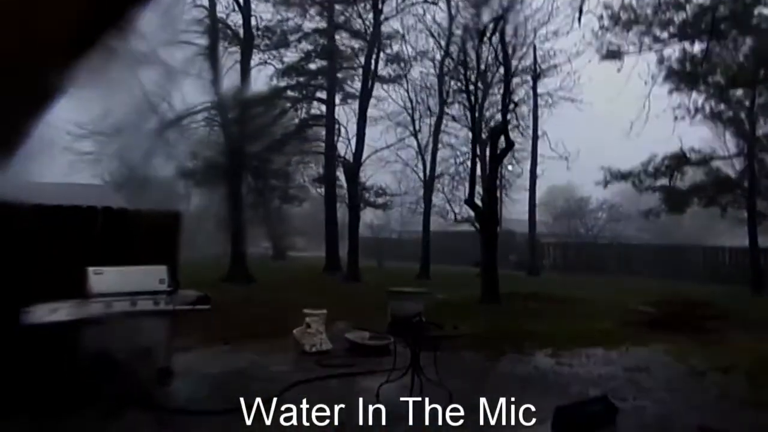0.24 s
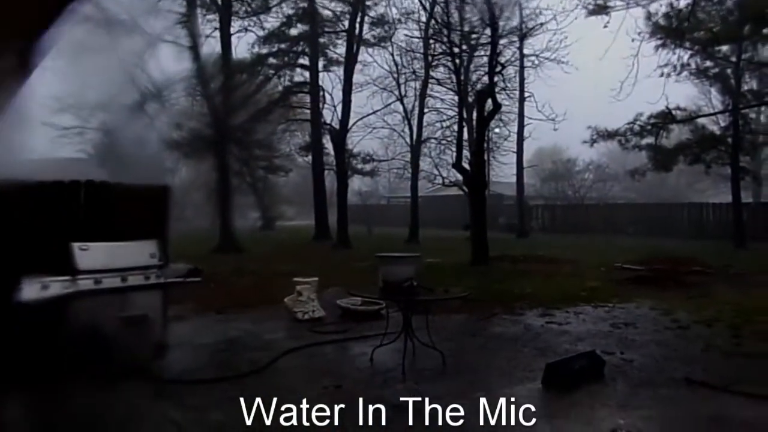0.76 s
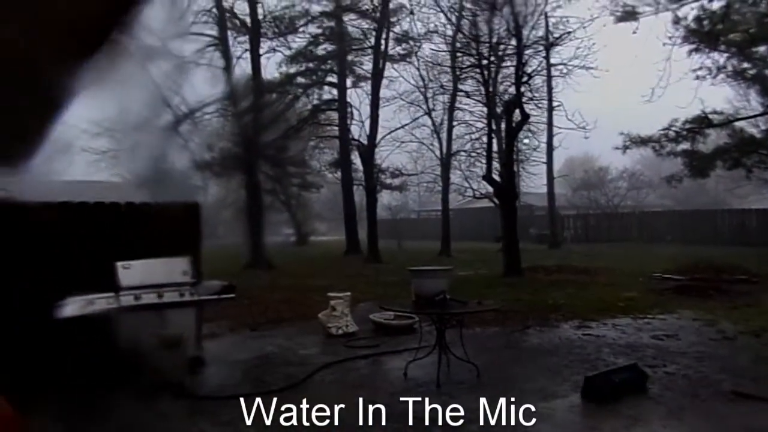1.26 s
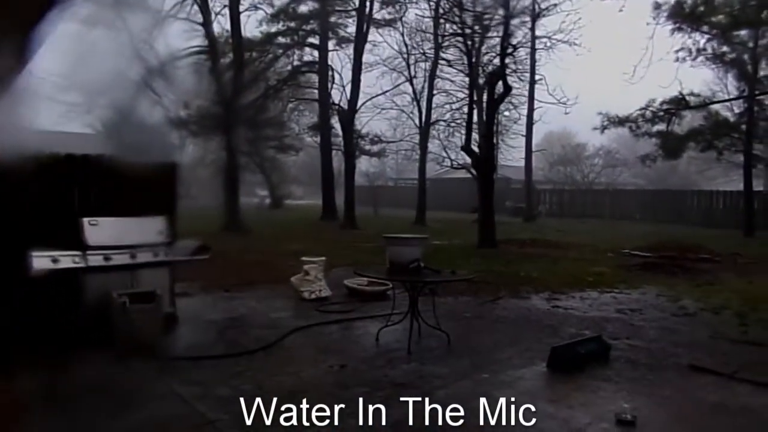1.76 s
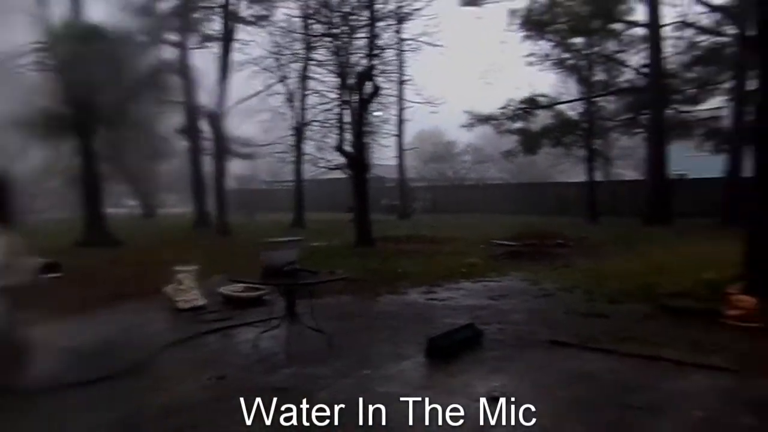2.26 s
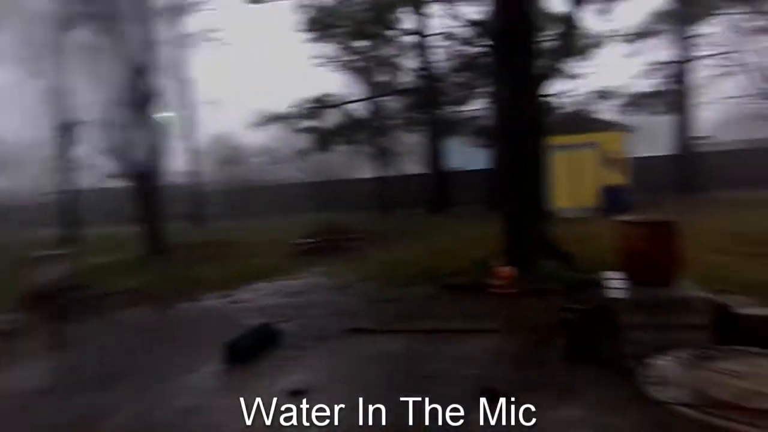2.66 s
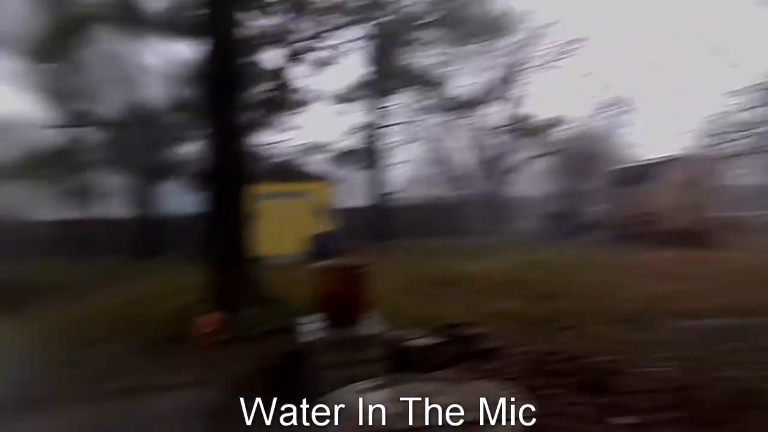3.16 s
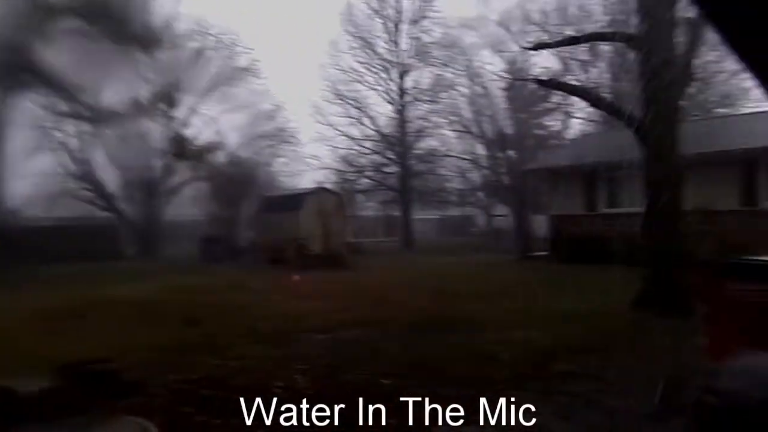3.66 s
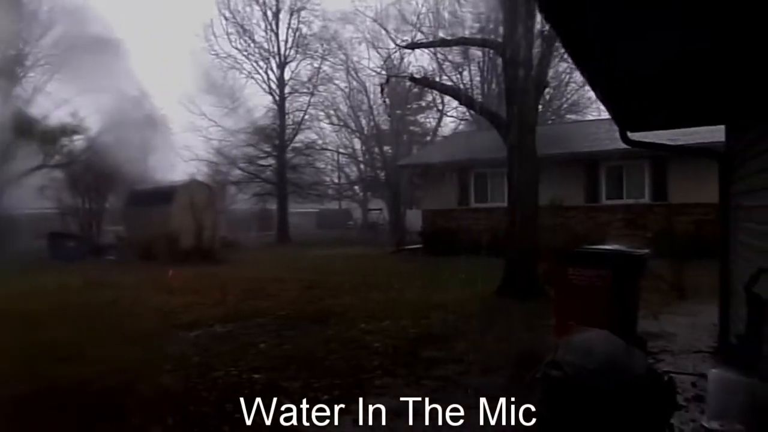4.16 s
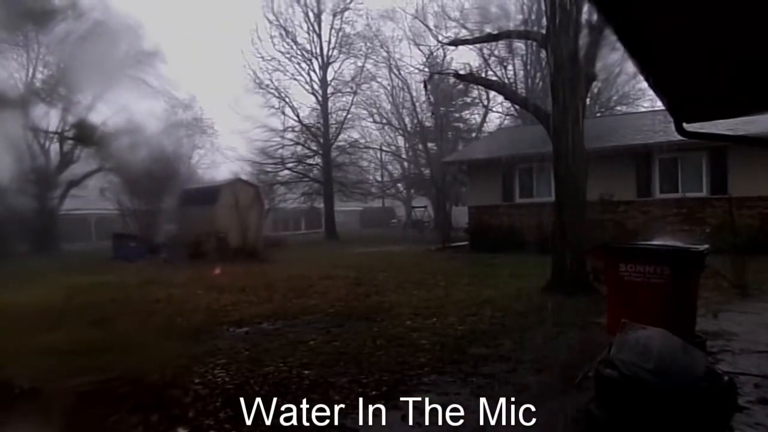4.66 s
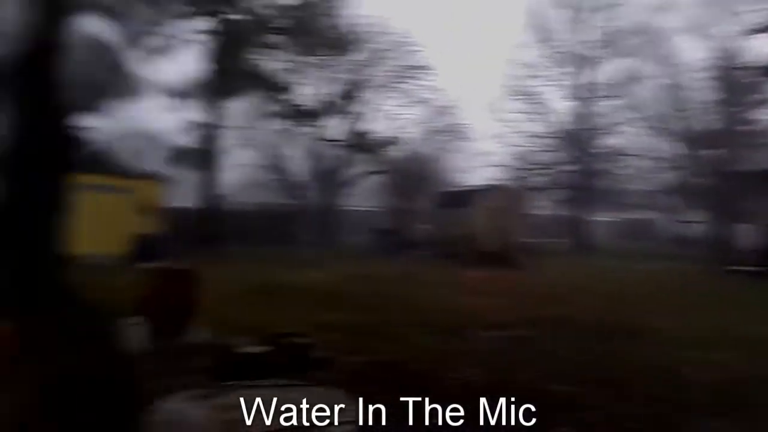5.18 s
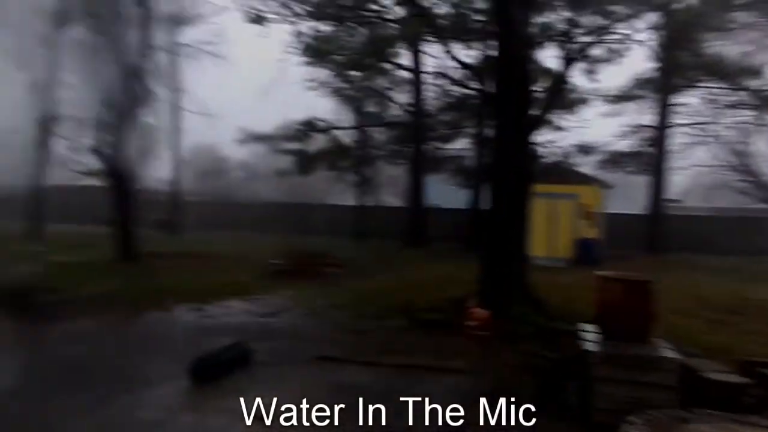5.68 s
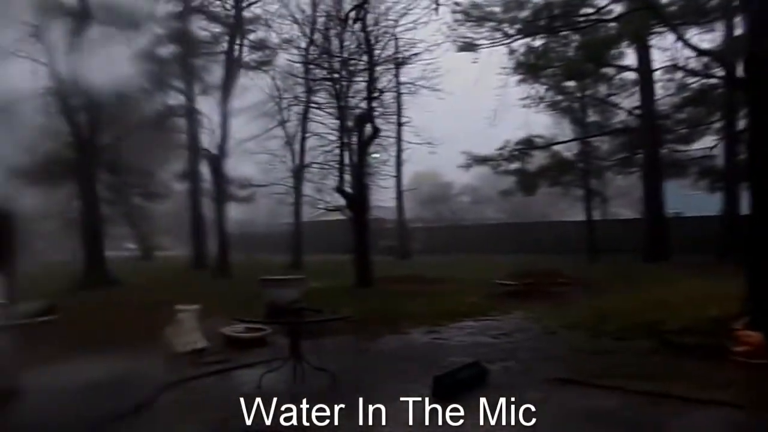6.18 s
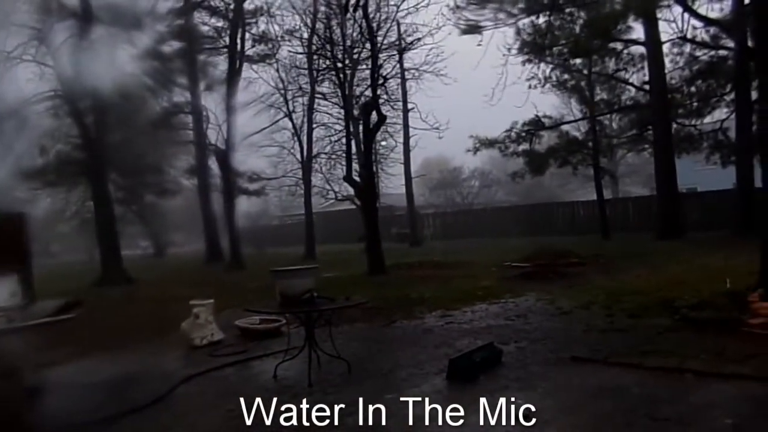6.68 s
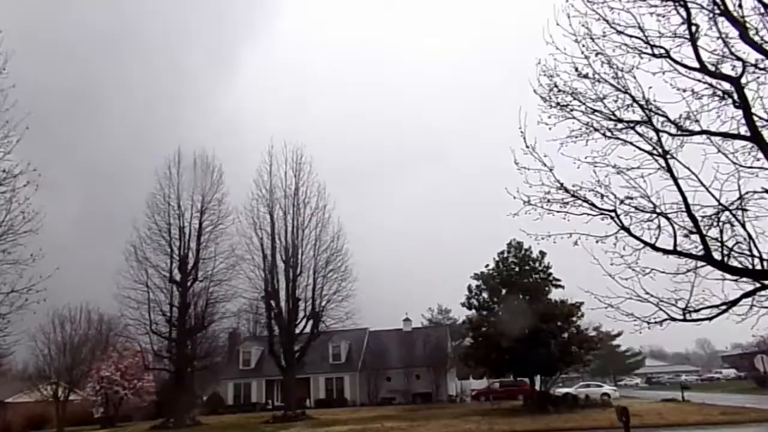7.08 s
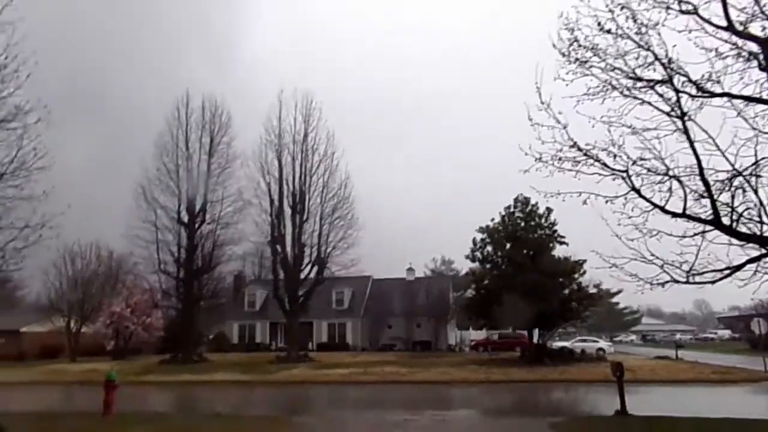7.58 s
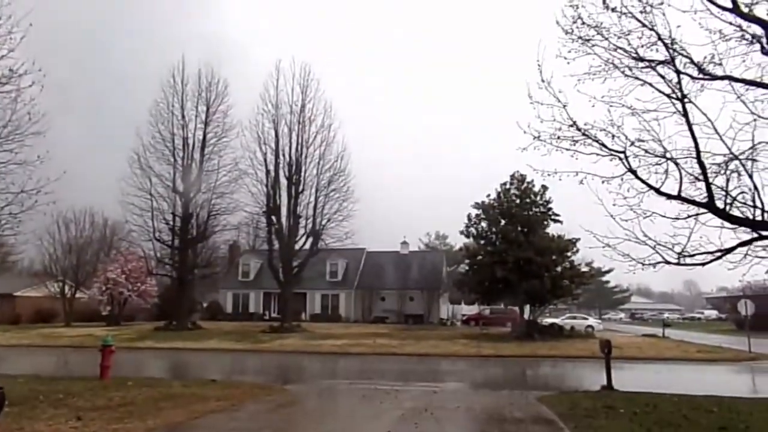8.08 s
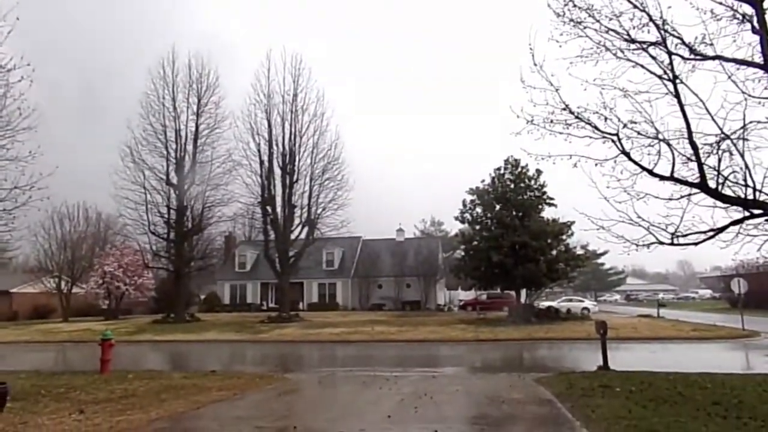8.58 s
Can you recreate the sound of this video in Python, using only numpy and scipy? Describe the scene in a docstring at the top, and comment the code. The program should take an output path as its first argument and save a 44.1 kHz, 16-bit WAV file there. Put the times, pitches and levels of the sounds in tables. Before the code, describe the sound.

Steady rain on a patio and lawn heard through a handheld microphone plugged with water: dull, hollow, ringing at two middle pitches. A very loud knock and splash come at the start, smaller knocks and rubs after a second, then occasional taps and drips and a low far thump near four seconds. At about seven seconds it cuts to quieter, open hissing rain, with a thunder crack followed by heavier booms rolling to the end.

```python
"""Steady rain on a patio and lawn, from under the eaves, on a camera held in the hand with water in its mic port:
noise and pings of near drops, dulled and made to ring at two pitches by the water plug. Shaped noise makes
splashes, thumps, rubs and far rolls of thunder; short ringing pulses make knocks, and band bursts make drips.
After a cut the port is clear: the rain hisses openly, and thunder cracks and booms as decaying noise."""
import sys
import numpy as np
from scipy import signal
from scipy.fft import rfft, irfft
from scipy.io import wavfile
from scipy.ndimage import uniform_filter1d

SR = 44100
rng = np.random.default_rng(int(sys.argv[2]) if len(sys.argv) > 2 else 0)


def wav_record(signal):
    """Record a signal, one row per channel, as 16-bit PCM in the file named by sys.argv[1]."""
    frames = np.transpose(np.atleast_2d(signal))
    bounded = np.clip(frames, -1, 1)
    # unit amplitude maps onto the largest positive 16-bit level
    quanta = np.round(bounded * 32767).astype(np.int16)
    wavfile.write(sys.argv[1], SR, quanta)


N = 389844
TIME = np.arange(N) / SR  # s
FREQ = np.arange(8193) * SR / 16384  # Hz


def undb(db):
    """Decibels to gain."""
    return 10 ** (np.asarray(db) / 20)


def unit(x):
    """Scale to rms 1."""
    return x / np.sqrt(np.mean(x ** 2))


def slopes(points):
    """Gain in dB over frequency, drawn through (Hz, dB) points on a log frequency axis."""
    hz, db = np.transpose(points)
    return np.interp(np.log(FREQ + 1), np.log(hz), db)


def bumps(rows):
    """Gain in dB over frequency of bell-shaped resonances or dips (Hz, width Hz, dB)."""
    return sum(db * np.exp(-((FREQ - hz) / width) ** 2) for hz, width, db in rows)


def colour(x, db):
    """Causal minimum-phase filter with the given gain, so that resonances ring after a blow."""
    cepstrum = irfft(np.log(undb(db)))[:len(FREQ) - 1]
    cepstrum[1:] *= 2  # fold the cepstrum onto positive time
    spectrum = np.exp(rfft(cepstrum, 2 * len(cepstrum)))
    response = irfft(spectrum)[:len(FREQ) // 2]
    return signal.oaconvolve(x, response)[:len(x)]


def walk(rate):
    """Random levels held 1 / rate s and slewed twice; spread near 1."""
    hold = max(int(SR / rate), 1)
    steps = np.repeat(rng.standard_normal(N // hold + 1), hold)
    slewed = uniform_filter1d(uniform_filter1d(steps, hold), hold)
    return np.sqrt(2) * slewed[:N]


def add(track, s, sound):
    """Mix a sound in at time s."""
    start = int(s * SR)
    track[start:start + len(sound)] += sound[:N - start]


def bell(s, half_s):
    """A smooth rise and fall around time s; peak 1."""
    return np.exp(-((TIME - s) / half_s) ** 2)


def strike(rise_s, t60):
    """One second of envelope: a straight rise, then a steady decay by 60 dB in t60 seconds."""
    t = TIME[:SR]
    decay = np.exp(-np.log(1000) * np.maximum(t - rise_s, 0) / t60)
    return np.minimum(t / rise_s, 1) * decay


def burst(decay_s, db, size=4096):
    """A short splash of force through a filter; peak 1."""
    force = rng.standard_normal(size) * np.exp(-TIME[:size] / max(decay_s, 1 / SR))
    x = colour(force, db)
    return x / np.abs(x).max()


def grainy(grain_db, db):
    """One second of noise with a rough, flickering level, coloured; rms 1."""
    rough = rng.standard_normal(SR) * undb(grain_db * walk(500)[:SR])
    return unit(colour(rough, db))


def swells(rows, db):
    """Grainy noise of one colour that swells and fades once for each row."""
    power = sum(undb(2 * level_db) * bell(s, half_s) for s, half_s, level_db in rows)
    rough = rng.standard_normal(N) * undb(3.0 * walk(300))
    return np.sqrt(power) * unit(colour(rough, db))


def patter(spread_db, cycles, count, size=256):
    """Many drops, each a ping of a cycle or two at its own pitch; a few land near and are loud."""
    when, pitch, near = rng.random((count, 3)).T
    hz = 500 * 32 ** pitch
    closeness = -np.log(np.maximum(near, .004))  # large for few drops
    turns = hz[:, None] * TIME[:size]
    strength = hz * undb(spread_db * closeness)
    pings = strength[:, None] * np.sin(2 * np.pi * turns) * np.exp(-turns / cycles)
    places = (when * N).astype(int)[:, None] + np.arange(size)
    return unit(np.bincount(places.ravel(), pings.ravel(), N + size)[:N])


def rain(drops_db, spread_db, cycles, flicker_db):
    """Far drops merge into a wash, near ones patter on top; the fall is slightly uneven."""
    near = undb(drops_db) * patter(spread_db, cycles, count=12000)
    return (rng.standard_normal(N) + near) * undb(flicker_db * walk(25))


# Rain as it comes through the wet port. Each row: frequency in Hz, relative level in dB per Hz.
WET_RAIN_COLOUR = [(30, -29), (90, -8.5), (220, 3.5), (330, 1), (500, 0.5), (620, -3.5), (1130, 1),
                   (1500, -14), (3100, -20), (3900, -29), (4700, -28.5), (6100, -49), (8600, -54),
                   (10600, -38), (14500, -48.5)]
# Ringing of the water plug in the port. Each row: pitch in Hz, width in Hz, gain in dB.
PLUG_RINGS = [(719.2, 70.6, 16.5), (965.6, 76, 13.5)]


def wet_port_gain():
    """Gain in dB of the wet port: muffled treble and the two resonances of the plug."""
    return slopes(WET_RAIN_COLOUR) + bumps(PLUG_RINGS)


RAIN_WET_DB = -23
# the rain swells a little as the camera turns across the yard
TURN_S, TURN_HALF_S, TURN_DB = 3.06, 0.66, 1.3


def wet_rain():
    """Rain on patio and lawn, heard through the ringing plug of water."""
    fall = rain(drops_db=-5.5, spread_db=2.5, cycles=1.0, flicker_db=0.94)
    level_db = RAIN_WET_DB + TURN_DB * bell(TURN_S, TURN_HALF_S)
    return unit(colour(fall, wet_port_gain())) * undb(level_db)


# Drops that land right on the port, at no distance. Each row: start in seconds, splash peak in dB.
PORT_SPLASHES = [(0.1961, 12.5), (1.2245, -21), (4.8985, -21.5)]
# a softer splash loses treble: dB per octave above 2 kHz, for each dB less
SPLASH_DECAY_S, SPLASH_DULLING = 0.0018, 0.3


def port_hits():
    """A drop on the port is a burst of force that dies at once; the harder it lands, the brighter."""
    out = np.zeros(N)
    splash = slopes([(500, -5), (1200, 0.5), (1900, 10.5), (2300, -2.5), (3000, 7), (3800, -7.5),
                     (5200, 5), (8000, -17), (15000, -9.5)])
    hardest_db = max(db for _, db in PORT_SPLASHES)
    octaves = np.log2(np.maximum(FREQ / 2000, 1))
    for s, splash_db in PORT_SPLASHES:
        dulling = SPLASH_DULLING * (hardest_db - splash_db) * octaves
        add(out, s, undb(splash_db) * burst(SPLASH_DECAY_S, splash - dulling))
    return out


# The casing thumps where a finger meets it. Each row: middle in seconds, level in dB.
CASING_THUMPS = [(0.201, -13), (1.227, -14.5), (1.316, -21), (1.379, -27)]
THUMP_HALF_S, THUMP_HZ = 0.0046, 190  # half length, and how high a thump reaches


def thumps():
    """Short, deep pushes that reach the microphone through the casing."""
    deep = -10 * np.log10((1 + (FREQ / THUMP_HZ) ** 4) * (1 + (40 / (FREQ + 1)) ** 2))
    rows = [(s, THUMP_HALF_S, level_db) for s, level_db in CASING_THUMPS]
    return swells(rows, deep)


# Drops and fingers knock on the water plug. Each row: middle in seconds, level in dB.
PLUG_KNOCKS = [(.2012, 7.5), (1.229, -0.5), (1.245, -10), (1.366, -7.5), (1.379, -5), (1.734, -16),
               (2.31, -11.5), (2.97, -13.5), (4.686, -10.5), (4.902, -10.5), (5.399, -13.5), (7.075, -7.5)]
# How a knock rocks the plug at both resonances. Each row: pitch in Hz, strength in dB.
PLUG_MODES = [(738, -1.5), (955, -7.5)]
KNOCK_HALF_S = .0054  # half the length of a knock


def knocks(grit_db):
    """Each knock rocks the plug, swelling and dying within a few cycles, with a little grit."""
    out = np.zeros(N)
    port = wet_port_gain()
    t = TIME[:2048] - 2 * KNOCK_HALF_S
    ring = sum(undb(db) * np.sin(2 * np.pi * hz * t) for hz, db in PLUG_MODES)
    swell = np.exp(-(t / KNOCK_HALF_S) ** 2)
    for s, level_db in PLUG_KNOCKS:
        grit = undb(grit_db) * unit(colour(rng.standard_normal(len(t)), port))
        add(out, s + t[0], undb(level_db) * swell * (ring + grit))
    return out


# The loudest drips, close by. Each row: start in seconds, peak in dB, pitch in Hz.
NEAR_DRIPS = [(1.784, -24.5, 2100), (2.439, -27, 2500), (3.622, -26.5, 2720), (5.513, -28, 2470),
              (6.051, -29, 2500), (7.1718, -22.5, 9500), (7.292, -9, 2670), (7.337, -26, 9500),
              (7.787, -26, 9950)]
# softer drips fall at random, scattered in level and pitch
SOFT_DRIP_DB, SOFT_DRIP_SCATTER_DB, SOFT_DRIP_HZ, SOFT_DRIP_OCTAVES = -30.5, 1, 2350, .13


def drips(splash_s=0.0033, octaves=0.66, count=20):
    """Big drops from the eaves tick on the paving, each in a band around its own pitch."""
    out = np.zeros(N)
    soft = []
    times = rng.random(count) * TIME[-1]
    for s, (size, pitch) in zip(times, rng.standard_normal((count, 2))):
        peak_db = SOFT_DRIP_DB + SOFT_DRIP_SCATTER_DB * size
        soft.append((s, peak_db, SOFT_DRIP_HZ * 2 ** (SOFT_DRIP_OCTAVES * pitch)))
    for s, peak_db, hz in NEAR_DRIPS + soft:
        band = -10 * np.log10(1 + (np.log2((FREQ + 1) / hz) / octaves) ** 12)
        add(out, s, undb(peak_db) * burst(splash_s, np.maximum(band, -60)))
    return out


# Fingers rub the camera casing. Each row: middle in seconds, half length in seconds, level in dB.
CASING_RUBS = [(1.325, 0.038, -31.5), (1.376, 0.011, -26), (1.81, 0.051, -39.5)]


def rubs():
    """Skin sliding on the casing makes brief swells of grainy noise."""
    skin = slopes([(300, -10), (1200, 11.5), (3000, 1.5), (4700, -3.0), (6200, -27.5), (9000, -32),
                   (11000, -16.5), (15000, -30)])
    return swells(CASING_RUBS, skin)


# Rolls of far thunder. Each row: middle in seconds, half length in seconds, level in dB.
FAR_ROLLS = [(2.6, .78, -40), (3.33, .06, -29.5), (3.85, 0.043, -26.5), (7.71, 0.089, -29),
             (8.35, 0.28, -30.5), (8.86, 0.13, -18.5)]
# Colour of a roll through the wet port. Each row: frequency in Hz, relative level in dB per Hz.
WET_ROLL_COLOUR = [(25, -21), (90, 1), (150, -2), (210, 2), (420, -8.5), (800, -15.5), (2000, -63)]
# Colour of a roll through the clear port. Each row: frequency in Hz, relative level in dB per Hz.
CLEAR_ROLL_COLOUR = [(25, -41), (70, -2), (160, 1.5), (350, -2), (650, -5.5), (1200, -12), (1700, -16.5),
                     (5000, -48.5)]


def rolls(points):
    """Far thunder mutters as swells of low, grainy noise in the colour of the port."""
    return swells(FAR_ROLLS, slopes(points))


# Thunder strokes. Each row: start in seconds, level in dB, 60 dB decay in seconds, dull above in Hz.
THUNDER_STROKES = [(3.92, -17.5, 0.18, 250), (4.0, -28.5, .1, 400), (7.486, -24, 0.74, 1320),
                   (7.52, -27, 0.099, 210), (7.577, -21.5, 0.74, 1100), (7.648, -21.5, 0.11, 230),
                   (8.027, -34, .17, 1100), (8.122, -14, 0.091, 250), (8.137, -4, 0.22, 1680),
                   (8.501, -26, 0.65, 600), (8.645, -23.5, 0.28, 400), (8.733, -8.5, 0.33, 169),
                   (8.785, -12, 0.98, 298)]
# Colour of the shocks of a stroke. Each row: frequency in Hz, relative level in dB per Hz.
SHOCK_COLOUR = [(25, -38), (70, -10.5), (150, 4.5), (220, 2), (300, 4.5), (420, -0.5), (620, 0),
                (870, -0.5), (1330, -2.5), (1520, -12), (3300, -11.5), (5000, -28.5), (15000, -38)]
# a dull stroke rises slowly (cycles of its dulling pitch); ground and houses give each a second tail
RISE_CYCLES, TAIL_DB, TAIL_T60_S = 3.2, -9, 0.74


def thunder(grain_db=0.5, lowest_share=0.42):
    """Each stroke is a swarm of shocks from one stretch of the channel; air dulls it, echoes draw it out."""
    out = np.zeros(N)
    for s, level_db, t60, dull_hz in THUNDER_STROKES:
        # short shocks are bright and thin, long ones dull and deep
        pitch = (FREQ + 10) / dull_hz
        band_db = -10 * np.log10((1 + pitch ** 2.4) * (1 + (lowest_share / pitch) ** 2))
        body = grainy(grain_db, slopes(SHOCK_COLOUR) + band_db)
        rise_s = RISE_CYCLES / dull_hz
        tail = undb(TAIL_DB) * strike(rise_s, TAIL_T60_S)
        envelope = np.hypot(strike(rise_s, t60), tail)
        add(out, s, undb(level_db) * envelope * body)
    return out


# Rain as it comes through the clear port. Each row: frequency in Hz, relative level in dB per Hz.
CLEAR_RAIN_COLOUR = [(30, -31), (100, -4), (270, 0), (520, -0.5), (800, 0.5), (1550, -6.5), (2300, 0),
                     (3100, 0.5), (4000, -4), (5000, -6), (5900, -16), (7100, -7), (8500, -16.5),
                     (10500, -14), (15500, -22.5)]
RAIN_CLEAR_DB = -33


def clear_rain():
    """Open hiss of the rain once the port is clear."""
    fall = rain(drops_db=-1.5, spread_db=2.5, cycles=0.77, flicker_db=0.5)
    return unit(colour(fall, slopes(CLEAR_RAIN_COLOUR))) * undb(RAIN_CLEAR_DB)


# Tearing crackle of thunder. Each row: start in seconds, level in dB.
THUNDER_TEARS = [(7.485, -16.5), (7.601, -19.5), (8.027, -34), (8.14, -26.5), (8.19, -26)]
# Colour of the crackle. Each row: frequency in Hz, relative level in dB per Hz.
CRACKLE_COLOUR = [(200, -13), (1500, -12), (2100, 0), (3300, -1), (4000, -5.5), (5000, -9), (6000, -19),
                  (7100, -13.5), (8500, -23), (15000, -31)]
TEAR_RISE_S, TEAR_T60_S = .004, 0.36


def tears(grain_db=1.0):
    """The nearest branches of the flash rip with a bright, grainy crackle."""
    out = np.zeros(N)
    for s, level_db in THUNDER_TEARS:
        crackle = grainy(grain_db, slopes(CRACKLE_COLOUR))
        add(out, s, undb(level_db) * strike(TEAR_RISE_S, TEAR_T60_S) * crackle)
    return out


def wet_port():
    """Everything heard only while the port is wet, and the muffled rolls."""
    handling = thumps() + knocks(grit_db=-11) + rubs()
    return wet_rain() + port_hits() + handling + rolls(WET_ROLL_COLOUR)


def clear_port():
    """Open rain with the crackle and roll of thunder."""
    return clear_rain() + tears() + rolls(CLEAR_ROLL_COLOUR)


CUT_S = 7.118


def scene():
    """The wet port, a brief dip at the cut, then the clear port; drips and thunder strokes run through both."""
    dip = np.minimum(np.abs(TIME - CUT_S) / 0.01, 1)
    port = np.where(TIME < CUT_S, wet_port(), clear_port())
    return (port * dip + drips() + thunder())[None]


# Narrow dips of the microphone. Each row: frequency in Hz, width in Hz, gain in dB.
MICROPHONE_DIPS = [(3720, 65, -15), (8000, 230, -19), (11750, 120, -18)]
TOP_HZ = 15850


def record(dry):
    """The microphone has three narrow dips; the loudest blows clip and a steep low-pass cuts the top."""
    clipped = np.clip(colour(dry[0], bumps(MICROPHONE_DIPS)), -1, 1)
    low_pass = signal.ellip(10, .2, 70, TOP_HZ, fs=SR, output="sos")
    return signal.sosfilt(low_pass, clipped)[None]


dry = scene()
out = record(dry)
wav_record(out)
```